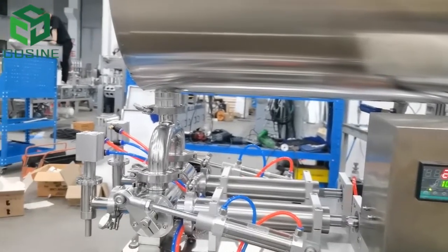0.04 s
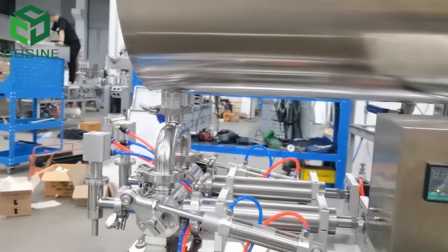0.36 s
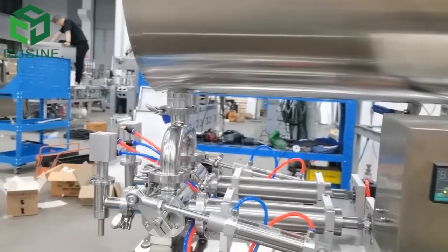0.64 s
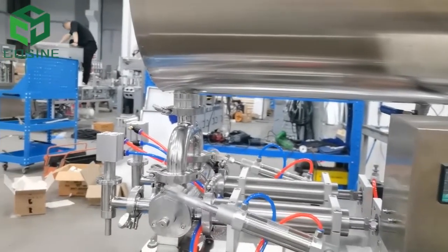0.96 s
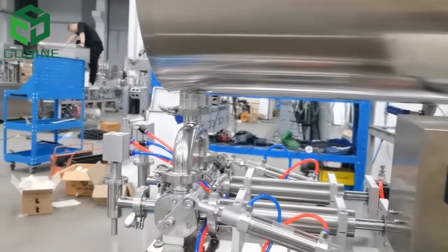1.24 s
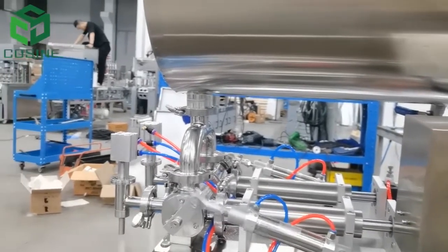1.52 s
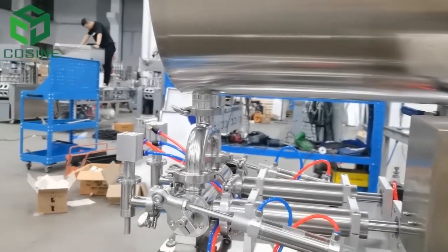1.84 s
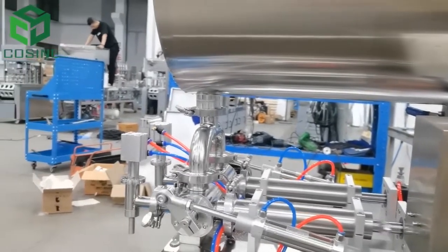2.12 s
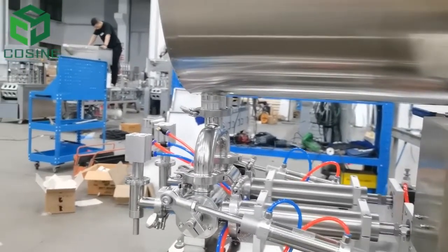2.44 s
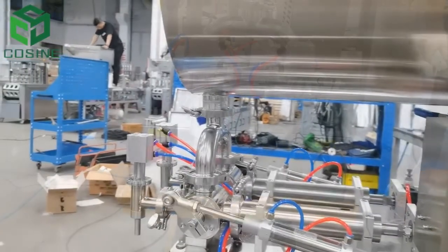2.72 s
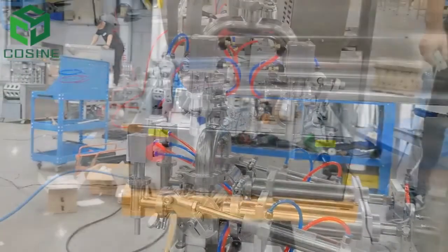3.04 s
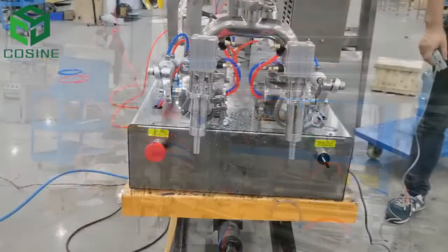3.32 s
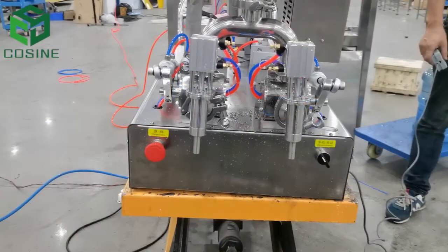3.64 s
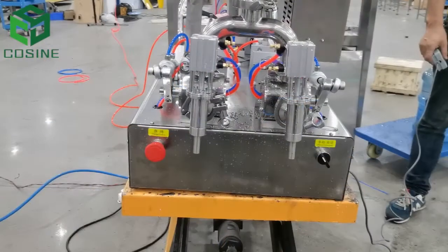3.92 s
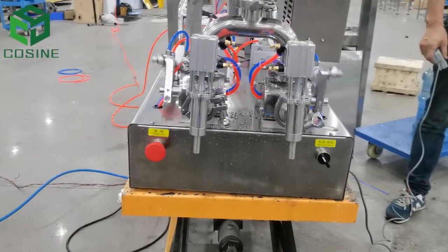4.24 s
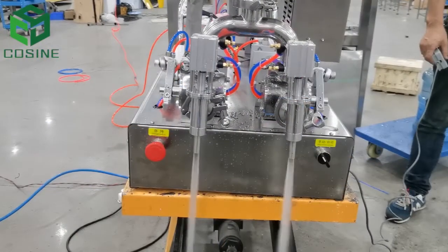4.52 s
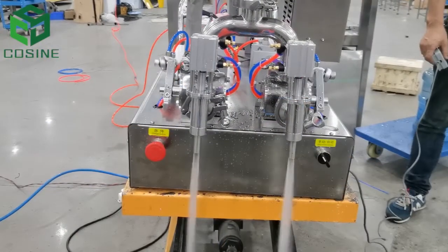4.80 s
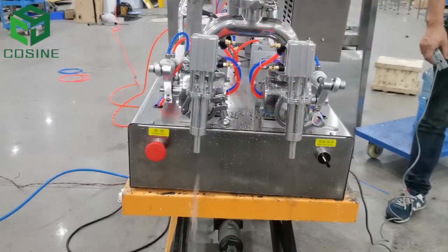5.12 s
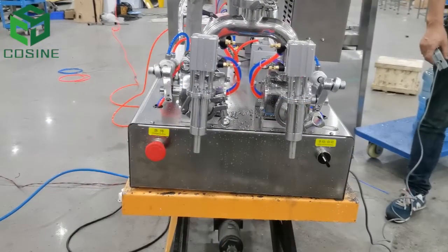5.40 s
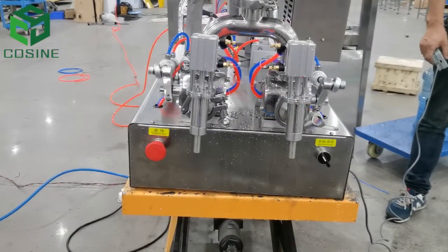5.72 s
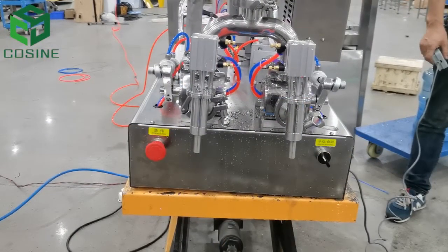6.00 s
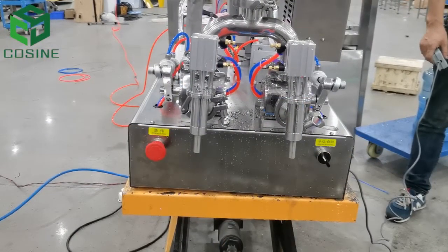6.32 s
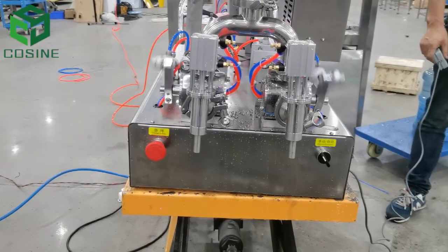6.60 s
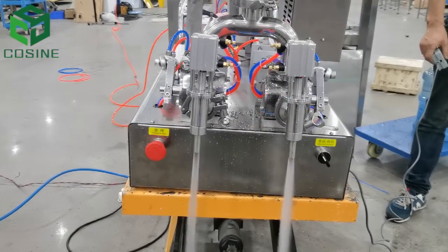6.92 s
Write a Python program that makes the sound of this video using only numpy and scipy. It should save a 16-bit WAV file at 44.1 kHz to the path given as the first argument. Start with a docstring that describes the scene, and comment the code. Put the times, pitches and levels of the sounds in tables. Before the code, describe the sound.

Workshop machinery rumbles and hums throughout, with a slight hall echo. Metal clangs far off at about 0.2 seconds, with faint squeals. At 0.8 and 1.5 seconds, a nearby pneumatic filler's valves thud and snap, dumping loud, bright bursts of compressed air. A softer hiss continues until about 2.3 seconds, then sinks into the rumble. Just after 3 seconds everything drops briefly to silence. At 3.3 seconds a second filler starts with a low rubbing piston stroke and light hiss, then thuds and blasts air at 4.1. Its nozzle clinks at 4.5 and squirts bubbling liquid into a hollow vessel, followed by more hiss and small knocks around 5 seconds. Quieter leaking air and thin whistles follow. Another thud and air blast arrive at 6.5 seconds, and a second gurgling squirt comes at about 7.

```python
"""Two air-driven piston fillers run one after the other while workshop machinery rumbles and hums.
First, metal clangs far off. Then the first filler's valves thud and dump air through a muffler,
and its cylinders let out the rest with a softer hiss. Just after 3 s comes a short silence.
The second filler then hisses and thuds in turn. Its nozzle clinks at about 4.5 s and squirts
bubbling liquid into a hollow vessel; another squirt follows at about 7 s."""
import sys
import numpy as np
from scipy import signal
from scipy.fft import rfft, irfft, next_fast_len
from scipy.io import wavfile

SR = 44100
rng = np.random.default_rng(int(sys.argv[2]) if len(sys.argv) > 2 else 0)


def file_out(sig):
    """Save sig as 16-bit WAV at sys.argv[1]."""
    # one column per channel
    cols = np.atleast_2d(sig).T
    # limit, then scale
    lim = np.clip(cols, -1, 1)
    pcm = np.round(lim * 32767).astype(np.int16)
    wavfile.write(sys.argv[1], SR, pcm)


N = 315315
TIME, FREQS_HZ = np.arange(N) / SR, np.fft.rfftfreq(N, 1 / SR)
SECOND_FILLER_S = 3.2  # the second filler takes over here

# How alike left and right sound (1 = the same, 0 = unrelated): frequency_hz, likeness
STEREO_LIKENESS = [(25, 1), (60, 1), (130, 1), (290, 1), (640, 0.42), (1400, 0), (3000, 0.0049)]


def exhaust():
    """Swirling air leaves the mufflers as a bright fizz over a lower rush, and the pipes ring along."""
    # Tone colour of the fizzing jet: frequency_hz, level_db
    fizz_colour = [(2000, -33.5), (4500, -12.5), (6500, -3.5), (8000, -2), (11000, 2), (13000, 3),
                   (14000, -2), (15600, -2)]
    # Tone colour of the lower rush: frequency_hz, level_db
    rush_colour = [(100, -31.5), (260, -18), (600, -17), (1050, -8), (1600, -12.5), (2100, -6.5),
                   (2400, -7), (2800, 0), (3500, -2.5), (4600, 0), (6000, -2), (8000, -8.5), (15000, -34.5)]
    top_hz = 11000  # the top of the fizz, above this, has its own loudness curve
    fizz_gain, top_gain, rush_gain = airflow()
    flutter = amp(0.75 * drift(54))
    hiss = steel_echoes(noise(fizz_colour), echo_gain=0.092)
    high_pass = 1 - 1 / (1 + (FREQS_HZ / top_hz) ** 20)
    top = irfft(rfft(hiss) * high_pass, N)
    jet = amp(0.5) * (fizz_gain * (hiss - top) + top_gain * top)
    rush = amp(1.85) * rush_gain * steel_echoes(noise(rush_colour), echo_gain=0.15)
    return flutter * (jet + rush) + pipes(fizz_gain, rush_gain)


def airflow():
    """Leaks, valve blasts and emptying cylinders add up to gain curves for fizz, its top and rush."""
    # A valve dumps air: start_s, hold_s, fizz_db, rush_db, build_s
    blasts = [(0.243, .015, -39, -29, .003), (.598, .02, -50, -36, .003), (0.775, 0.16, -16, -22.5, 0.0025),
              (1.276, .02, -25, -28, .005), (1.48, 0.066, -14, -20, .003), (1.632, 0.023, -21.5, -25, .005),
              (4.125, 0.17, -21, -27.3, 0.055), (4.684, .04, -28.5, -30.5, 0.017),
              (4.838, .17, -23.5, -29.3, .04), (5.177, .015, -37, -41, .003),
              (6.544, 0.19, -21.5, -28, 0.05), (7.098, .05, -29.5, -29, .02)]
    # A moving piston lets air out, fading as the pressure runs down:
    # start_s, end_s, rise_s, fizz_db, rush_db, fizz_fall_db, extra_top_fall_db
    bleeds = [(-.02, 0.079, .01, -30, -29.5, 1, 0), (0.098, .74, 0.13, -48.5, -39, 13, 4),
              (0.773, 2.306, 0.037, -24, -25.5, 6, -1.5), (3.295, 4.007, 0.13, -28.5, -36.5, 9.5, 15),
              (4.13, 5.064, 0.13, -31, -33.5, 2, -4), (5.06, 5.684, .03, -42.5, -44, 7.5, -5),
              (5.826, 6.343, 0.46, -45.5, -40, 0, 2), (6.25, 6.55, .2, -39.5, -41.5, -0.5, -2),
              (6.553, 7.15, 0.18, -32, -33.5, 2, -1)]
    fizz_lag, rush_lag = .45, 0.79  # share still missing when a valve has just opened
    fizz_power = per_filler(-66, -50.5) ** 2  # both start from the steady leaks
    rush_power = per_filler(-46.5, -55) ** 2
    for start, hold, fizz_db, rush_db, build in blasts:
        blast = stroke(start, start + hold, rise_s=.008, fall_db=0, release_db_per_s=89)
        missing = np.exp(-np.clip((TIME - start) / build, 0, 20))
        fizz_power += (amp(fizz_db) * blast * (1 - fizz_lag * missing)) ** 2
        rush_power += (amp(rush_db) * blast * (1 - rush_lag * missing)) ** 2
    top_power = fizz_power.copy()
    for start, end, rise, fizz_db, rush_db, fall_db, extra_fall_db in bleeds:
        for power, db, fall in ((fizz_power, fizz_db, fall_db),
                                (top_power, fizz_db, fall_db + extra_fall_db),
                                (rush_power, rush_db, 0.46 * fall_db)):
            power += (amp(db) * stroke(start, end, rise, fall, release_db_per_s=148)) ** 2
    return np.sqrt(fizz_power), np.sqrt(top_power), np.sqrt(rush_power)


def pipes(fizz_gain, rush_gain):
    """Flowing air makes mufflers and tubes ring; each pitch swells and fades on its own."""
    # Ringing of the first filler's pipes: pitch_hz, width_hz, level_over_flow_db
    first_pipes = [(224, 90, -16.5), (807, 150, -13), (1424, 560, -9.5), (4090, 80, -15),
                   (4450, 130, -11.5), (4780, 100, -13.5), (5440, 400, -13.5), (9670, 160, -20),
                   (12470, 500, -14)]
    # Ringing of the second filler's pipes: pitch_hz, width_hz, level_over_flow_db
    second_pipes = [(303, 94, -12), (1070, 140, -18), (2720, 160, -16), (4270, 220, -17), (4980, 80, -21),
                    (9590, 140, -20.5)]
    out = np.zeros((2, N))
    switch = round(SECOND_FILLER_S * SR)
    sputter = unit(amp(1.9 * drift(13)))
    for rings, span in ((first_pipes, slice(0, switch)), (second_pipes, slice(switch, N))):
        for hz, width, db in rings:
            flow = fizz_gain if hz > 7000 else rush_gain
            drive = (flow * np.roll(sputter, rng.integers(N)))[span]
            out[:, span] += amp(db) * drive * pitched_noise(hz, width, len(drive))
    return out


def squeals():
    """Narrow air valves and seals squeal or whistle."""
    # Each whistle: start_s, end_s, pitch_hz, width_hz, level_db
    whistles = [(0.241, .55, 1725, 130, -41), (.24, .76, 4560, 249, -51), (0.571, .81, 1740, 80, -36.5),
                (2.062, 2.449, 834, 170, -33), (2.55, 3.06, 8030, 40, -57),
                (4.305, 4.395, 1070, 160, -32.5), (4.68, 4.725, 4210, 250, -32.5),
                (4.921, 5.18, 1080, 170, -35.5), (5.1, 5.746, 5700, 1300, -43.5),
                (5.098, 6.051, 1057, 70, -51), (5.149, 5.75, 1570, 80, -51.5),
                (6.02, 6.52, 2200, 1410, -41.5), (6.03, 6.45, 4600, 700, -45)]
    out = np.zeros((2, N))
    for start, end, hz, width, db in whistles:
        size = round((end - start) * SR)
        add(out, start, amp(db) * pitched_noise(hz, width, size) * signal.windows.tukey(size, .4))
    return out


def thuds():
    """A valve or piston hits its stop; the frame rings low until the piston settles and damps it."""
    # Each hit: start_s, level_db, pitch_hz
    hits = [(.782, -5, 209), (.94, -14.5, 261), (1.002, -18, 224), (1.486, -11, 210), (1.563, -9.5, 233),
            (1.664, -13.5, 293), (4.13, -9, 228), (4.844, -13.5, 238), (4.946, -17.5, 266),
            (4.971, -18.5, 227), (5.079, -19, 231), (5.109, -23.5, 191), (6.548, -10, 225.4),
            (6.793, -20, 172), (6.825, -25, 152)]
    # The frame's tones: pitch_multiple, level_db, ring_s (time to fade by 60 dB)
    frame_tones = [(1, 1, 0.1), (1.36, -4.5, 0.092), (.5, -15, 0.11), (2.3, -15, 0.06), (3.3, -16.5, 0.09),
                   (4.7, -21.5, .06)]
    rise_s, settle_s = 0.0019, 0.027
    out, t = np.zeros(N), np.arange(SR // 4) / SR
    for start, db, hz in hits:
        ring = sum(amp(db + tone_db - 60 * t / ring_s) * np.sin(2 * np.pi * hz * multiple * t)
                   for multiple, tone_db, ring_s in frame_tones)
        attack = 1 - np.exp(-t / rise_s)
        add(out, start, ring * attack / (1 + (t / settle_s) ** 6))
    return hall(out, echo_db=-13.5)


def ticks():
    """Nearby valves and spitting nozzles give short, sharp snaps."""
    # Each snap: start_s, level_db, pitch_hz, ring_s (time to fade by 60 dB)
    snaps = [(.776, -21, 4930, .02), (.784, -20.5, 680, 0.053), (1.191, -21, 10000, .04),
             (1.485, -18, 960, 0.078), (4.5418, -11.5, 2780, 0.0054), (4.545, -17.5, 2350, 0.017),
             (6.545, -29, 7150, 0.052), (6.963, -18.5, 5030, 0.011)]
    out, t = np.zeros((2, N)), np.arange(SR // 8) / SR
    for start, db, hz, ring_s in snaps:
        snap = pitched_noise(hz, 0.38 * hz, len(t))
        centred = snap[0] + 0.45 * snap  # the two sides share most of the snap
        add(out, start, centred * amp(db - 60 * t / ring_s))
    return hall(out, echo_db=-8)


def clink():
    """A steel part of the nozzle rings briefly as it opens."""
    # The part's tones: pitch_hz, level_db, ring_s (time to fade by 60 dB)
    steel_tones = [(1140, -7, .06), (2422, 2, 0.052), (2780, -8, .08), (3908, -5, .1)]
    start_s, level_db = 4.543, -21.5
    out, t = np.zeros(N), np.arange(SR // 4) / SR
    for hz, db, ring_s in steel_tones:
        add(out, start_s, amp(level_db + db - 60 * t / ring_s) * np.sin(2 * np.pi * hz * t))
    return hall(out, echo_db=-8.5)


def liquid(bubbles_per_s=3200, spread_octaves=0.96, pitch_count=20):
    """Jets of liquid drive clouds of bubbles into a hollow vessel, with a few big gulps."""
    # Gushing and gurgling: start_s, end_s, level_db, pitch_hz
    gushes = [(1.24, 1.28, -19, 780), (4.574, 4.738, -19.5, 533), (4.7, 5.009, -29.5, 930),
              (4.9, 5.084, -33.5, 1900), (4.86, 5.15, -35, 202), (6.725, 6.796, -34, 720),
              (7.008, 7.2, -23, 778), (7.049, 7.2, -34.5, 215)]
    # Single large bubbles as the jets plunge in: start_s, level_db, pitch_hz
    gulps = [(4.592, -7, 670), (4.6, -6, 673), (4.611, -5.5, 566), (4.68, -7, 600), (7.013, -9, 688),
             (7.027, -5, 685), (7.0385, -6, 650), (7.045, -6.5, 498)]
    # Hollow tone colour of the vessel: frequency_hz, level_db
    vessel_colour = [(100, -11), (230, 0.5), (450, -2.5), (560, -2.5), (800, 3), (990, -8), (1150, 1.5),
                     (1330, 0), (1520, -9), (1780, 3), (1980, -5), (2300, 3), (5000, -18.5)]
    out = np.zeros(N)
    for start, end, db, hz in gushes:
        size = round((end - start) * SR)
        born = rng.random((pitch_count, SR // 2)) < bubbles_per_s / pitch_count / SR
        push = rng.choice([-1, 1], born.shape)
        kicks = (push * born)[:, :size] * signal.windows.tukey(size, .25)
        pitches = hz * 2 ** (spread_octaves * np.linspace(-1, 1, pitch_count))
        cloud = sum(signal.fftconvolve(row, bubble(pitch, fade_cycles=1.53)) * np.sqrt(pitch / hz)
                    for row, pitch in zip(kicks, pitches))
        strength = np.sqrt(np.sum(cloud ** 2) / size + 1e-12)
        add(out, start, amp(db) * cloud / strength)
    for start, db, hz in gulps:
        add(out, start, amp(db) * bubble(hz, fade_cycles=2.9))
    hollow = irfft(rfft(out) * amp(look_up(vessel_colour, FREQS_HZ)), N)
    return hall(hollow, echo_db=-7.5) * amp([[1.2], [-1.2]])  # a little to the left


def bubble(hz, fade_cycles):
    """A pocket of air swells, then rings for a few cycles, rising a little in pitch."""
    cycles = np.arange(SR // 25) / SR * hz
    tone = np.sin(2 * np.pi * cycles * (1 + 0.0046 * cycles))
    return tone * np.exp(-cycles / fade_cycles) * (1 - np.exp(-cycles / 0.5))


def clangs():
    """Metal clangs far off, each of its tones a blurred band of noise."""
    # Each clang: start_s, level_db, rise_s
    strikes = [(0.244, -19.5, 0.04), (.6, -30, 0.013)]
    # The metal's tones: pitch_hz, level_db, ring_s (time to fade by 60 dB)
    metal_tones = [(495, -2.5, 0.6), (597, -3, 0.5), (350, -6, 0.35), (1180, -9, .45), (1690, -12.5, 0.9),
                   (2790, -16.5, .5)]
    out, t = np.zeros((2, N)), np.arange(SR) / SR
    for start, db, rise in strikes:
        for hz, tone_db, ring_s in metal_tones:
            swell = np.minimum(t / rise, 1) * amp(db + tone_db - 60 * np.maximum(t - rise, 0) / ring_s)
            ring = pitched_noise(hz, width_hz=110, size=len(t))
            add(out, start, swell * unit(ring + .5 * ring[::-1]))  # each side spills into the other
    return out


def machinery():
    """Machines roar and rumble, louder while a piston rubs and shudders, over wavering motor hums."""
    # A piston rubs along its cylinder: start_s, end_s, roar_db, fall_db, shudder_db, shudder_hz
    rubs = [(0.23, 1.8, -31.5, -1, -56, 170), (2.07, 2.49, -28.5, 10, -33.5, 152),
            (3.31, 4.073, -24, 5.5, -36.5, 153), (5.72, 5.9, -58, 0.5, -46, 158),
            (5.55, 6.95, -61, 0.5, -47, 90.5)]
    # Tone colour of the roar: frequency_hz, level_db
    roar_colour = [(100, -18), (200, -3.5), (330, -2.5), (500, -3.5), (620, -3), (850, -2.5), (1100, -5.5),
                   (1500, -8.5), (2000, -16), (2600, -12.5), (3300, -21), (6000, -26.5), (10000, -31.5),
                   (16000, -41)]
    # Tone colour of the deep rumble: frequency_hz, level_db
    rumble_colour = [(20, -11.5), (40, -4), (70, -0.5), (120, -1), (160, 0.5), (230, -3.5), (400, -22),
                     (1000, -58)]
    # Motor hums: filler (0 = first, 1 = second), pitch_hz, level_db
    motors = [(0, 597, -46.5), (1, 602, -54), (1, 307.7, -55)]
    rub, shudder = np.zeros((2, N))
    waver = drift(10)
    for start, end, roar_db, fall_db, shudder_db, hz in rubs:
        travel = stroke(start, end, rise_s=0.067, fall_db=fall_db, release_db_per_s=102)
        rub += amp(roar_db) * travel
        shudder += amp(shudder_db) * travel ** 3 * hum(hz, waver_hz=5 * waver)
    roar_gain = np.hypot(per_filler(-28, -40), rub)
    rumble_gain = np.hypot(per_filler(-36, -44.6), amp(-10.5) * rub)
    roar = roar_gain * steel_echoes(noise(roar_colour), echo_gain=0.097) * amp(drift(40))
    rumble = rumble_gain * noise(rumble_colour) * amp(1.4 * drift(10))
    out = roar * amp([[.7], [-.7]]) + rumble + shudder  # the roar sits a little to the left
    for filler, hz, db in motors:
        running = (TIME > SECOND_FILLER_S) == round(filler)
        out += amp(db) * hum(hz, waver_hz=3.5 * waver) * running
    return out


def hum(hz, waver_hz):
    """A tone whose pitch wavers along a slow random curve."""
    pitch_hz = hz + np.roll(waver_hz, rng.integers(N))
    return np.sqrt(2) * np.sin(2 * np.pi * np.cumsum(pitch_hz) / SR)


def steel_echoes(sound, echo_gain, count=24):
    """Quick echoes off nearby steel colour a noise differently on the left and right."""
    delay_s = rng.uniform(.002, .016, (count, 2))
    echoes = np.zeros((2, SR // 20))
    echoes[:, 0] = 1  # the direct sound
    echoes[[0, 1], (delay_s * SR).astype(int)] = echo_gain * rng.choice([-1, 1], delay_s.shape)
    return unit(signal.oaconvolve(sound, echoes, axes=1)[:, :N])


def hall(sound, echo_db):
    """The hall adds a tail of scattered echoes whose highest pitches die first."""
    # How long the hall rings: frequency_hz, ring_s (time to fade by 60 dB)
    ring_times = [(150, 0.76), (600, 0.44), (3000, 0.67), (12000, 0.23)]
    echoes = rng.standard_normal((2, SR)) * (rng.random((2, SR)) < .06)
    hz, t, bands = signal.stft(echoes, SR, nperseg=256)
    fade = amp(-60 * t / look_up(ring_times, hz)[:, None])
    tail = signal.istft(stereo(bands, hz[:, None]) * fade, SR, nperseg=256)[1]
    tail /= np.linalg.norm(tail[0])
    return sound + amp(echo_db) * signal.fftconvolve(np.atleast_2d(sound), tail, axes=1)[:, :N]


def stroke(start, end, rise_s, fall_db, release_db_per_s):
    """Gain of one stroke: it rises, sags ever faster by fall_db as pressure runs out, then dies away."""
    gain, live = np.zeros(N), (TIME > start) & (TIME < end + 1)
    t, length = TIME[live] - start, end - start
    sag_db = fall_db * np.minimum(t / length, 1) ** 2.9
    release_db = release_db_per_s * np.maximum(t - length, 0)
    gain[live] = np.minimum(t / rise_s, 1) * amp(-sag_db - release_db)
    return gain


def per_filler(first_db, second_db):
    """One steady gain for the first filler, another for the second."""
    return np.where(TIME < SECOND_FILLER_S, amp(first_db), amp(second_db))


def noise(colour):
    """Stereo noise with the given tone colour."""
    white = stereo(rfft(rng.standard_normal((2, N))), FREQS_HZ)
    return unit(irfft(white * amp(look_up(colour, FREQS_HZ)), N))


def pitched_noise(hz, width_hz, size):
    """Stereo noise gathered around one pitch."""
    length = 2 * next_fast_len(size // 2 + 1)
    freqs = np.fft.rfftfreq(length, 1 / SR)
    peak = 1 / (1 + ((freqs - hz) / width_hz * 2) ** 2)
    pair = irfft(rfft(rng.standard_normal((2, length))) * peak)
    return unit(stereo(pair, hz))[:, :size]


def stereo(pair, hz):
    """Blends two noises into left and right: alike in the bass, unrelated in the treble."""
    left, other = pair
    likeness = look_up(STEREO_LIKENESS, hz)
    return np.array([left, likeness * left + np.sqrt(1 - likeness ** 2) * other])


def drift(rate_hz):
    """A smooth random curve that wanders no faster than about rate_hz."""
    return unit(irfft(rfft(rng.standard_normal(N)) * np.exp(-(FREQS_HZ / rate_hz) ** 2), N))


def look_up(points, hz):
    """Reads between a table's rows, with frequency spaced by octaves."""
    freqs, values = np.transpose(points)
    return np.interp(np.log(hz + 1), np.log(freqs + 1), values)


def add(mix, start_s, sound):
    """Mixes a sound in at the given time."""
    part = mix[..., max(round(start_s * SR), 0):][..., :sound.shape[-1]]
    part += sound[..., :part.shape[-1]]


def amp(db):
    """Turns decibels into a gain."""
    return 10 ** (np.asarray(db) / 20)


def unit(x):
    """Scales a signal to an average strength (rms) of one."""
    return x / np.sqrt(np.mean(x ** 2) + 1e-20)


def scene():
    """Air, machinery, knocks and liquid together."""
    return exhaust() + squeals() + machinery() + thuds() + ticks() + clink() + clangs() + liquid()


def record(dry):
    """Colours each side's treble, fades out between the fillers, clips peaks and cuts the very top."""
    # Treble peaks and dips on each side: frequency_hz, width_hz, left_db, right_db
    treble_peaks = [(4360, 690, 4.5, 2), (7730, 620, -0.5, 5), (9785, 950, 12, -5), (12260, 830, 4.5, -7),
                    (15000, 1300, 5.5, 1)]
    # The short silence between the fillers: time_s, level_db
    pause = [(3.05, -5), (3.075, -27), (3.1, -78), (3.328, -75), (3.333, 2)]
    colour_db = sum(np.array([[left], [right]]) * np.exp(-((FREQS_HZ - hz) / width) ** 2)
                    for hz, width, left, right in treble_peaks)
    times, levels_db = np.transpose(pause)
    fade = amp(np.interp(TIME, times, levels_db))
    heard = irfft(rfft(dry) * amp(colour_db), N) * fade
    low_pass = signal.firwin(511, cutoff=15850, window=("kaiser", 9), fs=SR)
    return signal.oaconvolve(np.clip(heard, -1, 1), low_pass[None], "same")


dry = scene()
out = record(dry)
file_out(out)
```